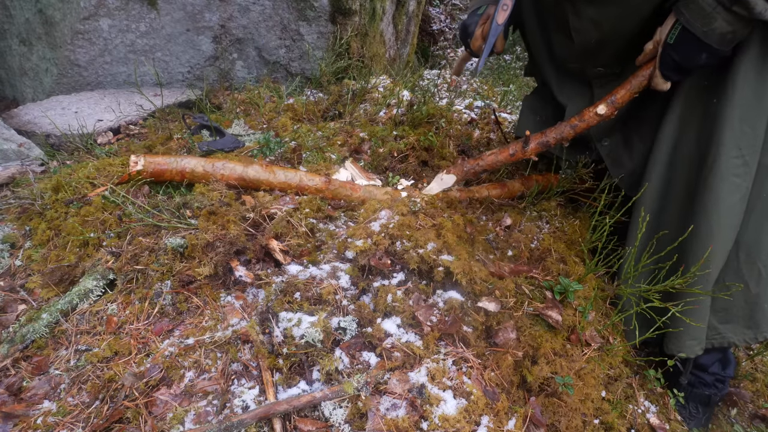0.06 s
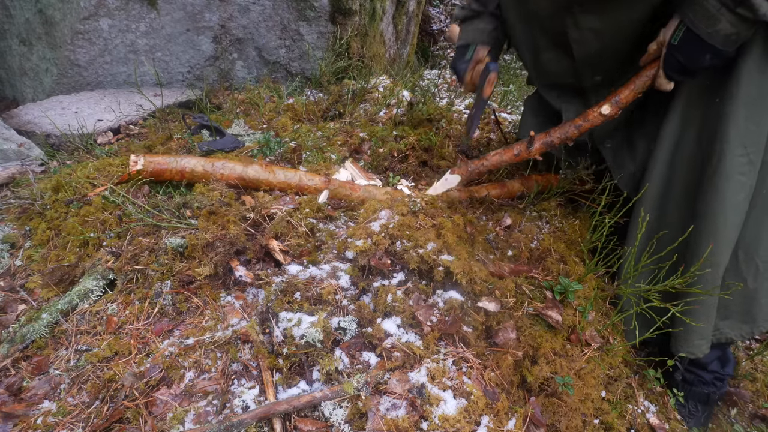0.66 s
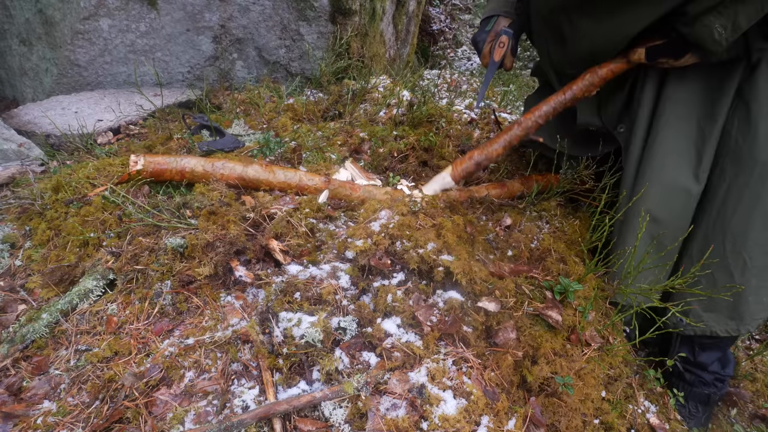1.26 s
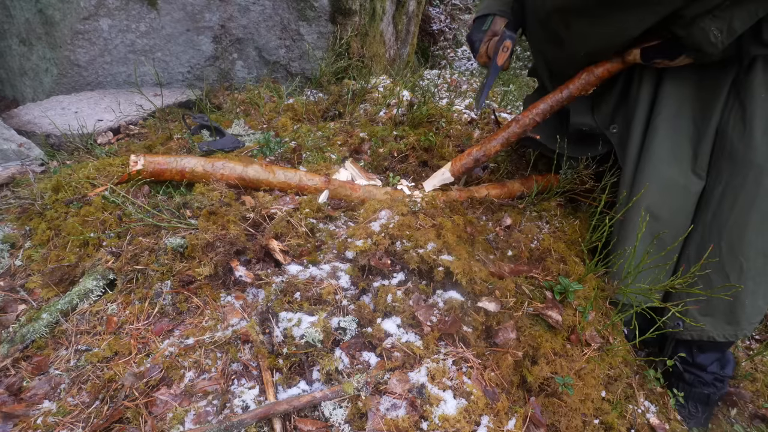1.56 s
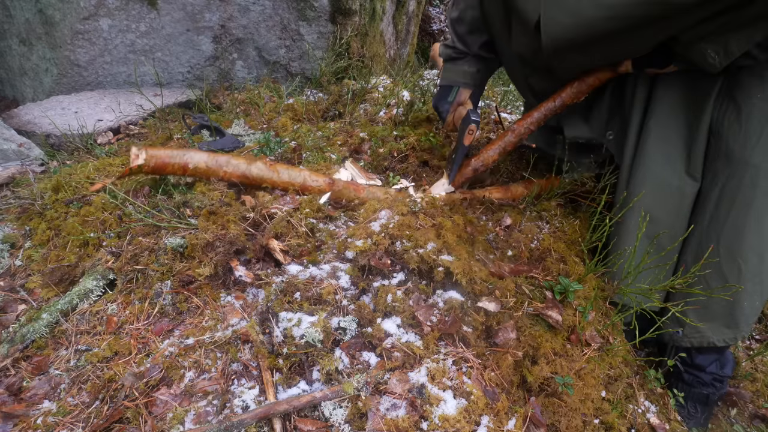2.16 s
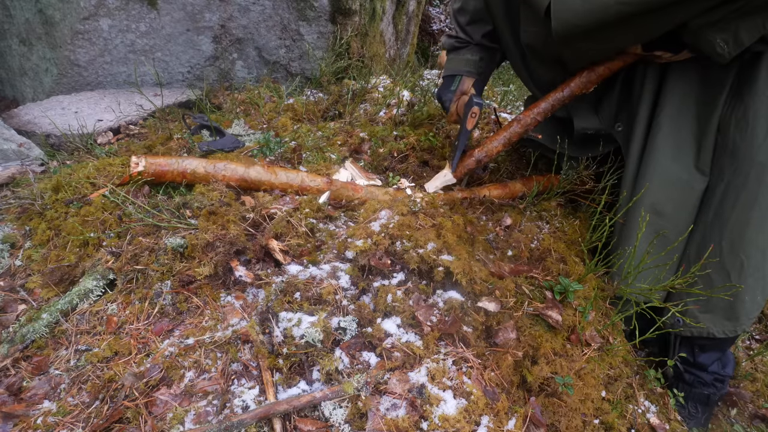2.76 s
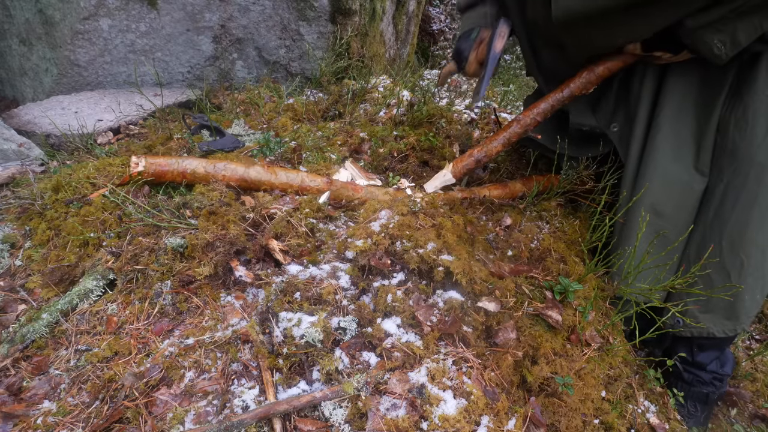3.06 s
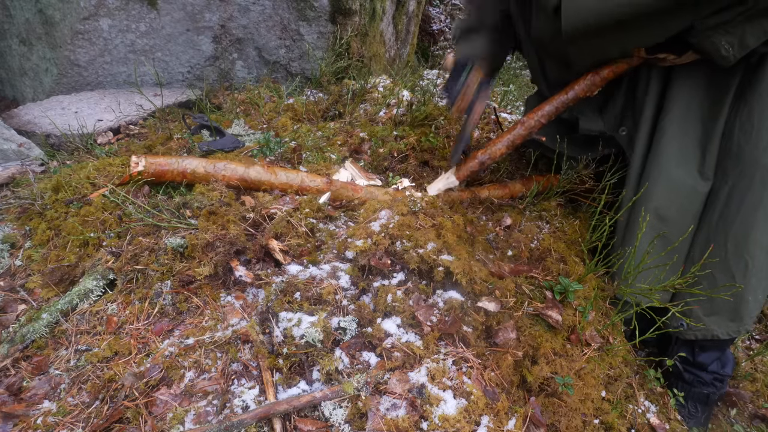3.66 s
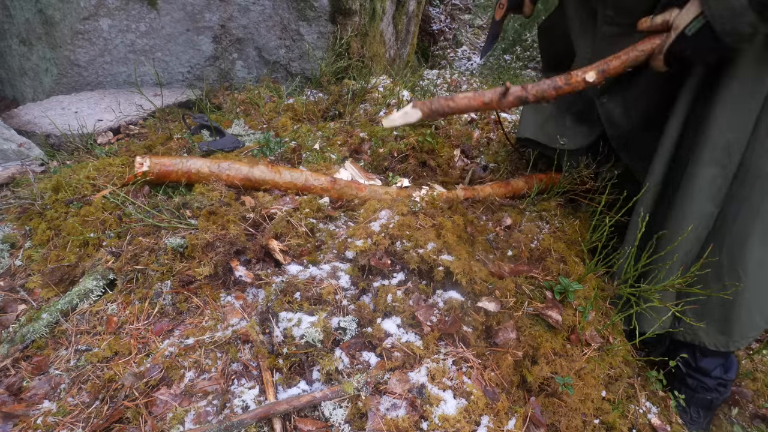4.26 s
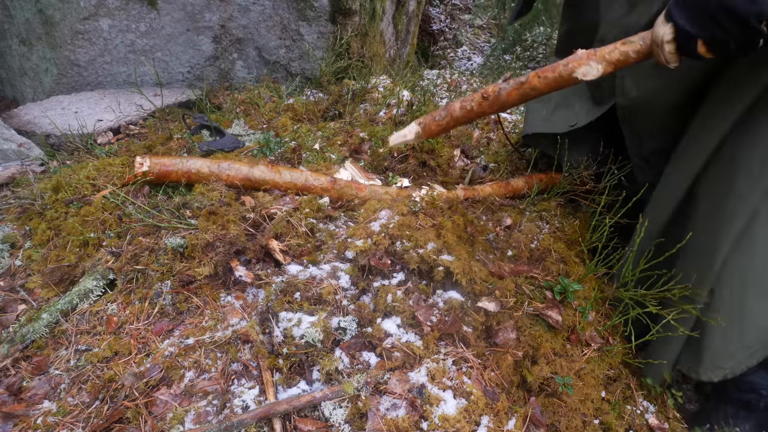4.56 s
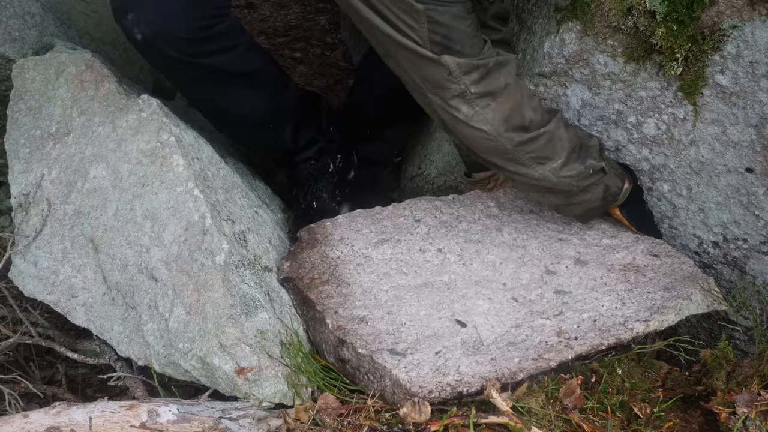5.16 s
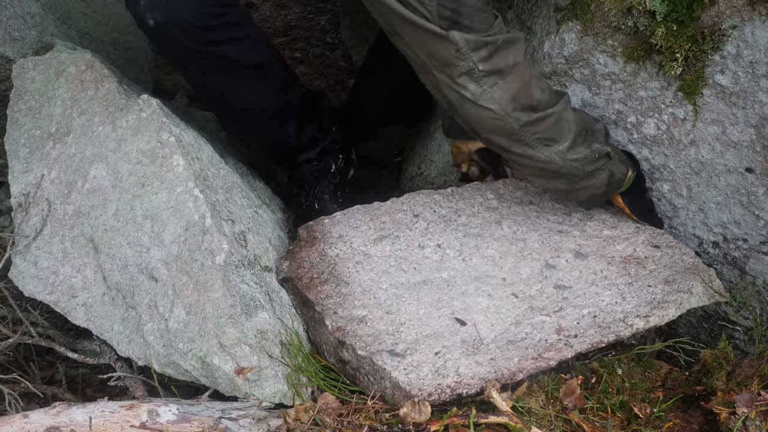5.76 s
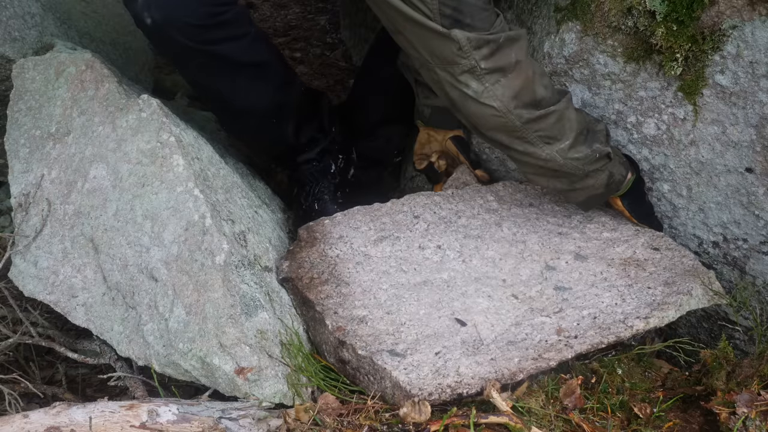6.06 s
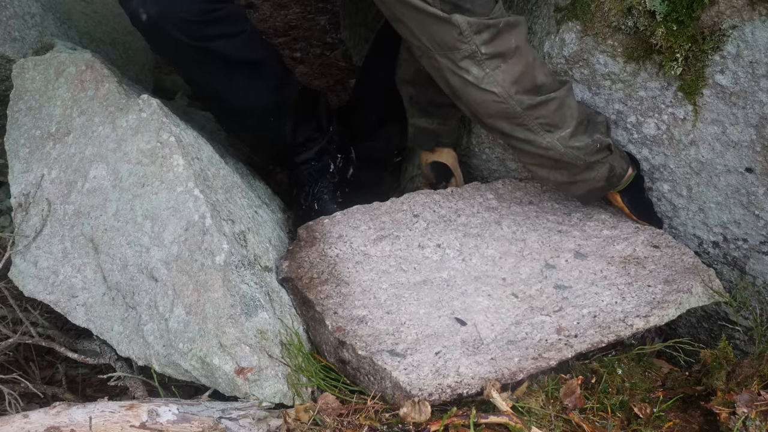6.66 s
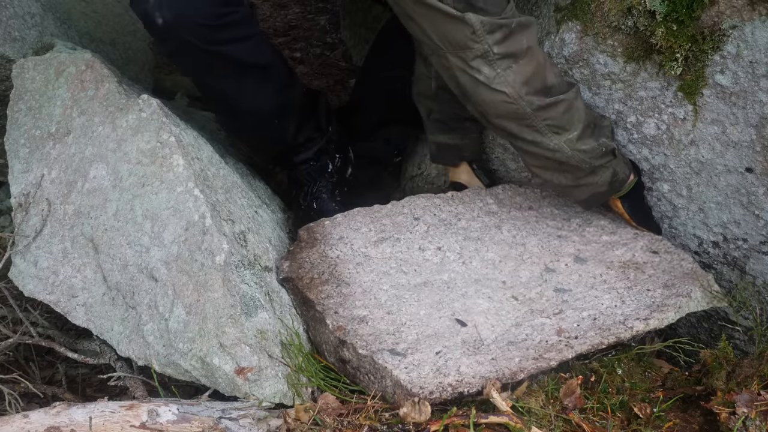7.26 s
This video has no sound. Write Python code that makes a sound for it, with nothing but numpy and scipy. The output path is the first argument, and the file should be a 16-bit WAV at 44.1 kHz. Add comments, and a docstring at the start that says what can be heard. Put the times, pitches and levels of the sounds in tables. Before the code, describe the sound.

A heavy knife chops a wooden pole in a quiet forest while a coat rustles, then stones knock and grind.

```python
"""Chopping a pole, shifting stones.

In a winter forest a heavy knife chops the tip of a wooden pole that rests on mossy ground.
Each chop bites, tears fibres and shakes the soil; a long coat rustles between the strokes.
Then stones are shifted by hand in a gap between boulders: they knock, ring and grind."""
import sys
import numpy as np
from scipy import signal
from scipy.io import wavfile

SR = 44100
rng = np.random.default_rng(int(sys.argv[2]) if len(sys.argv) > 2 else 0)


def wav_out(sig):
    """Save sig, one row per channel (or a flat mono array), as 16-bit PCM at SR to the path in sys.argv[1]."""
    wavfile.write(sys.argv[1], SR, np.round(np.clip(np.atleast_2d(sig).T, -1, 1) * 32767).astype(np.int16))


N = 322371
TIME = np.arange(N) / SR


def gain_of(db):
    """Decibels to amplitude."""
    return 10 ** (np.asarray(db) / 20)


def unit_rms(x):
    return x / np.sqrt(np.mean(x ** 2) + 1e-20)


def unit_peak(x):
    return x / abs(x).max()


def value_at(points, hz):
    """Interpolates (Hz, value) points on a log-frequency axis."""
    point_hz, values = np.transpose(points)
    return np.interp(np.log(hz + 1), np.log(point_hz + 1), values)


def add(mix, start_s, sound):
    part = mix[max(round(start_s * SR), 0):][:len(sound)]
    part += sound[:len(part)]


def convolve(x, response):
    return signal.oaconvolve(x, response)[:len(x)]


def butterworth(x, kind, edges_hz, order=3):
    return signal.sosfilt(signal.butter(order, edges_hz, kind, fs=SR, output="sos"), x)


def sharpest_pulse(spectrum_db, size=4096):
    """Minimum-phase pulse with the spectrum spectrum_db(hz)."""
    hz = abs(np.fft.fftfreq(size, 1 / SR))
    log_gain = np.log(gain_of(np.maximum(spectrum_db(hz), -90)))
    spectrum = np.exp(np.conj(signal.hilbert(log_gain)))
    return np.fft.ifft(spectrum).real[:size // 2]


def coloured(x, points):
    """Filters x by (Hz, dB) points, to rms 1."""
    return unit_rms(convolve(x, sharpest_pulse(lambda hz: value_at(points, hz))))


def grains(per_s, spread_db=0, size=N):
    """Random clicks, rms 1; spread_db makes their sizes more uneven."""
    gains = gain_of(spread_db * np.minimum(rng.exponential(1, size), 4))
    return unit_rms(gains * rng.standard_normal(size) * (rng.random(size) < per_s / SR))


def contact(centre_hz, octaves, top_hz, db_per_octave=75):
    """One short push, peak 1; the contact time rolls it off above top_hz."""
    def spectrum_db(hz):
        bell_db = -10 * np.log10(1 + (np.log2((hz + 1) / centre_hz) / octaves) ** 4)
        return bell_db - db_per_octave * np.log2(np.maximum(hz / top_hz, 1))
    return unit_peak(sharpest_pulse(spectrum_db))


def ring(modes, centre_hz=None, octaves=1, size=SR // 4):
    """Decaying modes, peak 1; a blow feeds most those near its centre."""
    t = np.arange(size) / SR
    hz, db, t60_s = np.transpose(modes)[:, :, None]
    drive = 1 if centre_hz is None else 1 / (1 + (np.log2(hz / centre_hz) / octaves) ** 2)
    partials = drive * gain_of(db) * 1000 ** (-t / t60_s) * np.sin(2 * np.pi * hz * t)
    return unit_peak(partials.sum(0))


def swells(rows, attack_s, release_s, sag_db=0, db_column=2):
    """Gain curve of movements: each rises, sags while it lasts, then dies away."""
    power = np.zeros(N)
    for row in rows:
        start_s, length_s = row[:2]
        t = np.maximum(TIME - start_s, 0)
        attack = np.minimum(t / attack_s, 1)
        held = gain_of(row[db_column] + sag_db * np.minimum(t / length_s, 1))
        release = np.exp(-np.maximum(t - length_s, 0) / release_s)
        power += (attack * held * release) ** 2
    return np.sqrt(power)


def gliding_noise(rows, width_hz):
    """Noise in a resonance that follows (s, Hz, dB) rows."""
    times_s, hz, db = np.transpose(rows)
    span = slice(int(times_s[0] * SR), int(times_s[-1] * SR))
    carrier = np.exp(2j * np.pi * np.cumsum(np.interp(TIME[span], times_s, hz)) / SR)
    radius = np.exp(-np.pi * width_hz / SR)
    baseband = signal.lfilter([1], np.poly([radius, radius]), rng.standard_normal(N)[span] / carrier)
    out = np.zeros(N)
    out[span] = unit_rms((carrier * baseband).real)
    return out * gain_of(np.interp(TIME, times_s, db, left=-120, right=-120))


# Each row: frequency in Hz, relative level in dB.
HUSH_SPECTRUM = [(20, -1), (40, -5.5), (65, -10.5), (120, 2), (190, 1), (270, -4), (480, -1.5),
                 (700, -16.5), (1200, -15.5), (1750, -25.5), (2400, -31), (6000, -39), (16000, -44)]


def forest_hush(level_db=-54.5):
    """Steady noise of the distant forest."""
    return gain_of(level_db) * coloured(rng.standard_normal(N), HUSH_SPECTRUM)


# Each row: start in seconds, length in seconds, level in dB.
WEIGHT_SHIFTS = [(0, 0.071, -49), (4.73, .1, -57), (5.13, 0.29, -42.5), (6.04, 0.2, -48.5),
                 (6.5, 0.15, -48), (6.95, .36, -48)]


def tread():
    """The ground rumbles as body weight comes down on it."""
    spectrum = [(12, -20), (28, -1), (41, 2.5), (52, -15), (75, -33.5), (300, -55.5), (1000, -90)]
    rumble = coloured(rng.standard_normal(N), spectrum)
    return swells(WEIGHT_SHIFTS, attack_s=0.023, release_s=0.15) * rumble


# Each row: start in seconds, length in seconds, relative level in dB.
COAT_MOVES = [(-0.05, 0.16, -59), (.41, 0.24, -55), (.75, 0.35, -55.5), (1.22, 0.13, -55),
              (1.66, 0.22, -62.5), (2.03, 0.39, -53), (2.52, 0.051, -57.5), (2.85, 0.9, -62.5),
              (3.34, 0.56, -61.5), (3.73, .5, -55), (4.26, 0.85, -53), (5.45, 0.73, -53.5),
              (6.68, 0.53, -58.5)]
UNDERGROWTH_BRUSHES = [(4.4, 0.76, -64.5), (4.7, 0.062, -48.5)]
# Each row: frequency in Hz, relative level in dB.
RUB_SPECTRUM = [(200, -14.5), (500, -1.5), (1000, -0.5), (1600, -4), (2200, -19.5), (3500, -35),
                (6000, -38.5)]
CRINKLE_SPECTRUM = [(1180, -11.5), (2000, -7.5), (3520, -13.5), (3810, -15.5), (4080, -17), (7190, -23),
                    (12200, -36.5), (15100, -53.5), (16000, -49)]
# Each row: time in seconds, pitch in Hz, level in dB.
SWISH_GLIDE = [(4.22, 1400, -85), (4.28, 1060, -49.5), (4.33, 910, -58), (4.45, 1000, -70),
               (4.61, 1560, -56), (4.68, 1200, -49), (4.74, 1800, -47), (4.77, 2540, -66),
               (4.81, 1790, -78)]
SQUEAK_GLIDE = [(5.301, 2400, -72), (5.324, 3300, -74), (5.342, 4500, -67), (5.369, 4290, -65.5),
                (5.401, 4300, -69)]


def coat(rub_db=0.5, crinkle_db=-11):
    """Cloth rubs, crinkles, brushes dry undergrowth and swishes as it slides; a faint squeak rises."""
    motion = swells(COAT_MOVES, attack_s=0.05, release_s=0.12, sag_db=-1)
    brushing = swells(UNDERGROWTH_BRUSHES, attack_s=0.043, release_s=0.026)
    rub = gain_of(rub_db) * motion * coloured(grains(per_s=9300, spread_db=3), RUB_SPECTRUM)
    crinkle_gain = np.hypot(gain_of(crinkle_db) * motion, brushing)
    crinkle = crinkle_gain * coloured(grains(per_s=9500, spread_db=3), CRINKLE_SPECTRUM)
    swish = gliding_noise(SWISH_GLIDE, width_hz=530)
    squeak = gliding_noise(SQUEAK_GLIDE, width_hz=260)
    return rub + crinkle + swish + squeak


# Each row: frequency in Hz, relative level in dB, t60 in seconds.
POLE_MODES = [(331, 4, 0.053), (520, -3, 0.06), (738, 12, 0.027), (1044, 14, 0.03), (1265, 17, 0.029),
              (1430, 8.5, 0.047), (1790, -11, 0.12), (2950, -21.5, .009)]


def pole(centre_hz):
    """The struck pole rings, peak 1, mostly between 260 Hz and 2.3 kHz."""
    return unit_peak(butterworth(ring(POLE_MODES, centre_hz, octaves=0.44), "bandpass", [260, 2300]))


# Each row: frequency in Hz at pitch ratio 1, relative level in dB.
FIBRE_SPECTRUM = [(300, -8), (1200, 7.5), (2000, -7.5), (2500, 1.5), (3100, -1), (4200, -9), (5200, -14),
                  (8000, -13), (12000, -23.5), (16000, -34.5)]


def fibres(tear_t60_s, pitch_ratio, rise_s=0.00011, splinter_db=-13, splinter_t60_s=0.049):
    """Wood fibres tear and splinter in a dense burst of clicks."""
    t = np.arange(SR // 4) / SR
    attack = 1 - np.exp(-t / rise_s)
    decay = 1000 ** (-t / tear_t60_s) + gain_of(splinter_db) * 1000 ** (-t / splinter_t60_s)
    spectrum = np.multiply(FIBRE_SPECTRUM, [pitch_ratio, 1])
    return attack * decay * coloured(grains(per_s=7700, size=len(t)), spectrum)


# Each row: frequency in Hz, relative level in dB, t60 in seconds.
SOIL_MODES = [(29.94, 7.5, 2.7), (39.8, 27.5, 1.24), (49.4, -23, 0.63), (66, -25, .4)]


def soil(blow_db, settle_db=-45, settle_s=0.13):
    """Mossy ground sways at once, then settles in an uneven rumble."""
    t = np.arange(SR) / SR
    sway = butterworth(ring(SOIL_MODES, size=SR), "lowpass", 67.5)
    spectrum = [(15, -4.5), (45, 1.5), (90, -3), (160, -16), (400, -34.5), (1500, -68.5)]
    settling = coloured(grains(per_s=72, size=SR), spectrum) * np.exp(-t / settle_s)
    return gain_of(-38 + 0.16 * blow_db) * sway + gain_of(settle_db) * settling


# Each row: start in seconds, bite level in dB, bite centre in Hz, ring level in dB,
# ring centre in Hz, tear level in dB, tear t60 in seconds, fibre pitch ratio.
KNIFE_BLOWS = [(0.5000, -38, 1130, -4.5, 1110, -25, 0.024, 1),
               (0.5070, -9.5, 363, -28, 1160, -18, 0.019, 1.27),
               (0.523, -4.5, 437, -9.5, 356, -27.5, 0.016, 1),
               (2.134, -17, 990, -4.5, 656, -18, 0.027, 0.96),
               (2.168, -33, 114, -39.5, 400, -45.5, 0.04, 0.89),
               (3.2229, -2.5, 1167, -1, 740, -22.5, 0.048, 1.12),
               (3.776, -10, 1080, -5, 760, -25, 0.063, 1.17),
               (3.7930, -2.5, 555, -10, 370, -21, 0.017, 0.91)]


def chops():
    """The edge bites the pole and the follow-through drives it into the ground."""
    out = np.zeros(N)
    thud = contact(143, octaves=0.47, top_hz=284, db_per_octave=27)
    for start_s, bite_db, bite_hz, ring_db, ring_hz, tear_db, tear_t60_s, pitch_ratio in KNIFE_BLOWS:
        bite = contact(bite_hz, octaves=0.51, top_hz=1950, db_per_octave=56.5)
        add(out, start_s, gain_of(bite_db) * bite)
        add(out, start_s, gain_of(ring_db) * pole(ring_hz))
        add(out, start_s, gain_of(tear_db) * fibres(tear_t60_s, pitch_ratio))
        # A slow, low blow pushes the ground far harder than a quick one.
        add(out, start_s, gain_of(ring_db - 14) * (400 / ring_hz) ** 4 * thud)
        add(out, start_s, soil(ring_db))
    return out


# Each row: start in seconds, peak level in dB.
TWIG_SNAPS = [(0.605, -50), (0.7976, -46.5), (0.8574, -67), (1.037, -53), (1.4937, -41), (2.3243, -46),
              (2.5746, -40.5), (2.616, -51), (4.6053, -50), (4.629, -44), (4.877, -41.5), (5.0424, -48.5),
              (5.1066, -46), (5.2763, -52), (5.871, -32), (5.922, -34), (6.298, -51), (6.8544, -47)]


def twigs(lag_s=0.0013, crack_s=0.0013, rasp_db=-13, rasp_s=0.011):
    """Twigs and grit snap: a crack, then a short splintering rasp."""
    out, t = np.zeros(N), np.arange(SR // 20) / SR
    decay = np.exp(-t / crack_s) + gain_of(rasp_db) * np.exp(-t / rasp_s)
    crack = contact(3040, octaves=0.73, top_hz=14460)
    for start_s, peak_db in TWIG_SNAPS:
        snap = convolve(rng.standard_normal(len(t)) * decay, crack)
        add(out, start_s + lag_s, gain_of(peak_db) * unit_peak(snap))
    return out


# Each row: start in seconds, peak level in dB, centre in Hz.
CHIP_TAPS = [(0.689, -38.5, 681), (1.4965, -49, 1200), (2.2735, -27.5, 715), (2.582, -38.5, 1200),
             (2.618, -35.5, 830), (3.274, -29, 467), (3.821, -23.5, 920)]


def chips():
    """Wood chips land and the pole takes light taps, one push each."""
    out = np.zeros(N)
    for start_s, peak_db, centre_hz in CHIP_TAPS:
        add(out, start_s, gain_of(peak_db) * contact(centre_hz, octaves=0.51, top_hz=1740))
    return out


# Each row: frequency in Hz, relative level in dB, t60 in seconds.
GAP_MODES = [(125.7, -4, 0.14), (159.6, -8.5, 0.13), (201, 5, 0.042), (312, -2.5, 0.038), (490, 4, 0.02)]


def gap_boom(centre_hz):
    """The hollow between the boulders resonates with a boxy boom, peak 1."""
    return unit_peak(butterworth(ring(GAP_MODES, centre_hz, octaves=1.6), "bandpass", [135, 620]))


def sand(per_s=830, bands=6):
    """Sand grains crack in several pitch bands, rms 1."""
    cracks = sum(convolve(grains(per_s / bands, spread_db=2.5), contact(hz, octaves=0.46, top_hz=SR / 2))
                 for hz in np.geomspace(2000, 11000, bands))
    return coloured(cracks, CRINKLE_SPECTRUM)


# Each row: start in seconds, length in seconds, relative boom and rattle levels in dB.
HAND_SHOVES = [(5.385, 0.042, -55, -51), (5.52, 0.082, -38.5, -55), (5.62, 0.065, -39, -52),
               (5.72, 0.19, -43, -44), (5.953, 0.16, -32.5, -50), (6.19, 0.038, -39, -54.5),
               (6.43, 0.022, -36, -40.5), (6.52, 0.054, -35, -42), (6.62, 0.048, -31.5, -42.5),
               (6.905, 0.044, -37, -55), (7.0, 0.025, -33.5, -63), (7.066, .18, -33.5, -45.5),
               (7.256, 0.025, -25.5, -33)]
# Each row: frequency in Hz, relative level in dB.
ROLLING_SPECTRUM = [(60, -40), (150, -20.5), (320, 3.5), (700, -0.5), (1500, -2.5), (2100, -16),
                    (5000, -47)]
# Each row: start in seconds, length in seconds, level in dB.
SAND_SCUFFS = [(5.385, 0.054, -60), (5.8, .12, -61), (5.92, 0.048, -51), (6.83, 0.083, -61.5)]


def rubble(rolling_db=-1, pebble_db=-4, grit_db=-20, boom_db=1.5, attack_s=0.0033, release_s=0.029):
    """Shoved stones roll, bump and make the gap rumble; sand crackles under stone or boot."""
    boom = swells(HAND_SHOVES, attack_s, release_s, sag_db=-5)
    rattle = swells(HAND_SHOVES, attack_s, release_s, db_column=3)
    scuffing = swells(SAND_SCUFFS, attack_s=0.01, release_s=0.041)
    rolling = gain_of(rolling_db) * coloured(grains(per_s=1800, spread_db=2), ROLLING_SPECTRUM)
    bump = contact(810, octaves=1, top_hz=1620, db_per_octave=55)
    pebbles = gain_of(pebble_db) * unit_rms(convolve(grains(per_s=83, spread_db=6), bump))
    grit = (gain_of(grit_db) * rattle + scuffing) * sand()
    rumble = gain_of(boom_db) * unit_rms(convolve(grains(per_s=750, spread_db=4), gap_boom(140)))
    return rattle * (rolling + pebbles) + grit + boom * rumble


# Each row: frequency in Hz, relative level in dB, t60 in seconds.
SLAB_MODES = [(322, -6.5, 0.085), (467, -29, 0.026), (610, -2, 0.06), (672, 8, 0.052), (836, 1.5, 0.063),
              (1255, -10.5, 0.049), (1603, 8, 0.023), (1788, -0.5, 0.06), (2410, -4.5, 0.039)]
# Each row: start in seconds, clack level in dB, clack centre in Hz, ring level in dB, ring centre in Hz.
SLAB_STRIKES = [(5.4297, 1, 793, 5, 855), (5.4333, -11.5, 543, -9.5, 600), (5.9574, -16.5, 565, -7.5, 570),
                (6.0775, -30, 830, -11, 890), (6.2125, -60, 1410, -20, 1330), (7.0690, -53, 690, -19, 600)]
# Each row: start in seconds, length in seconds, level in dB.
SLAB_DRAGS = [(5.96, 0.094, -29.5), (6.08, 0.17, -46.5), (6.21, 0.038, -35)]


def slab():
    """A loose slab rings when struck and growls in the same modes when dragged over rock."""
    out = np.zeros(N)
    for start_s, clack_db, clack_hz, ring_db, ring_hz in SLAB_STRIKES:
        clack = contact(clack_hz, octaves=0.35, top_hz=1540, db_per_octave=40)
        ringing = butterworth(ring(SLAB_MODES, ring_hz, octaves=0.72), "lowpass", 2140)
        add(out, start_s, gain_of(clack_db) * clack)
        add(out, start_s, gain_of(ring_db) * ringing)
    spectrum = [(60, -44), (200, -25), (650, 12), (1200, 8), (1600, 4), (1950, 8.5),
                (2300, -5), (5000, 5.5)]
    slips = coloured(grains(per_s=1000, spread_db=8.5), spectrum)
    growl = unit_rms(convolve(slips, ring(SLAB_MODES)))
    return out + swells(SLAB_DRAGS, attack_s=0.008, release_s=0.0039) * growl


# Each row: start in seconds, peak level in dB, centre in Hz, width in octaves, thump in dB re peak.
STONE_KNOCKS = [(5.521, -18, 870, 0.85, -4.5), (5.547, -25.5, 845, 0.25, -14),
                (5.62, -12.5, 840, 0.86, -13.5), (5.663, -18.5, 1070, 0.63, -19),
                (5.693, -25, 1460, 0.7, -20), (5.71, -15, 1420, 0.61, -21), (5.74, -21, 1470, 0.61, -30),
                (5.871, -27, 870, 0.65, -25), (5.942, -4.5, 960, 0.78, -18), (6.436, -31, 1200, 1, -14),
                (6.457, -24, 880, .45, -1), (6.521, -23.5, 816, 0.93, 4.5), (6.622, -27, 820, 0.28, 3),
                (6.65, -24.5, 885, 0.71, 5.5), (7.126, -26.5, 755, 0.78, 5), (7.149, -20.5, 930, .74, -5),
                (7.17, -20, 890, 0.72, -16), (7.187, -16.5, 785, 0.25, -4.5), (7.216, -5.5, 860, 0.48, -14),
                (7.254, 3, 1350, 1, -22.5), (7.285, -18, 940, 1, -11)]


def knocks(lag_s=0.00191, echo_s=0.00515, echo_db=-13, thump_lag_s=0.00231, tick_s=0.0043):
    """Stone clacks on stone with a gritty tick; the boulder opposite echoes, the hollow thumps."""
    out, t = np.zeros(N), np.arange(SR // 20) / SR
    for start_s, peak_db, centre_hz, octaves, thump_db in STONE_KNOCKS:
        clack = gain_of(peak_db) * contact(centre_hz, octaves, top_hz=1467, db_per_octave=50)
        add(out, start_s + lag_s, clack)
        add(out, start_s + lag_s + echo_s, gain_of(echo_db) * clack)
        add(out, start_s + thump_lag_s, gain_of(peak_db + thump_db) * gap_boom(centre_hz / 1.13))
        grit = grains(per_s=4700, spread_db=3, size=len(t))
        grain_pulse = contact(rng.uniform(2300, 3260), octaves=0.7, top_hz=9000, db_per_octave=11)
        tick = unit_rms(convolve(grit, grain_pulse)) * np.exp(-t / tick_s)
        add(out, start_s + lag_s, gain_of(-51 + 0.27 * peak_db) * tick)
    return out


# Each row: frequency in Hz, t60 in seconds at t60_scale 1.
NEAR_DECAY = [(100, 0.21), (500, 0.066), (1500, 0.12), (4000, 0.14), (14000, 0.15)]


def forest_reverb(x, near_db, far_db, t60_scale):
    """Rocks and trunks scatter a short tail, the farther trees a faint long one."""
    hz, frame_s, noise_stft = signal.stft(rng.standard_normal(SR), SR, nperseg=128)
    t60_s = t60_scale * value_at(NEAR_DECAY, hz)[:, None]
    near = signal.istft(noise_stft * gain_of(-60 * frame_s / t60_s), SR, nperseg=128)[1][:SR]
    t = np.arange(SR) / SR
    near *= np.clip(t / 0.0053 - 0.5, 0, 1)
    far = coloured(rng.standard_normal(SR), [(100, -0.5), (1400, -9.5), (3000, -2), (12000, -1.5)])
    far *= np.exp(-t / 0.055) * np.minimum(t / 0.12, 1)
    tails = gain_of(near_db) * near / np.linalg.norm(near) + gain_of(far_db) * far / np.linalg.norm(far)
    return x + convolve(x, tails)


def scene():
    """Chopping, then stones, over the rustle and the hush; mono."""
    wood = forest_reverb(chops() + chips(), near_db=-11.5, far_db=-29, t60_scale=0.86)
    stone = forest_reverb(knocks() + slab(), near_db=-9, far_db=-38, t60_scale=0.34)
    return (wood + stone + rubble() + coat() + twigs() + tread() + forest_hush())[None]


def record(dry, low_cut_hz=18, band_limit_hz=16200):
    """Low cut below 18 Hz, overload on the hardest blows, then the band limit."""
    clipped = np.clip(butterworth(dry, "highpass", low_cut_hz, order=2), -1, 1)
    lowpass = signal.firwin(255, band_limit_hz, window=("kaiser", 8), fs=SR)
    return signal.oaconvolve(clipped, lowpass[None], "same")


dry = scene()
out = record(dry)
wav_out(out)
```